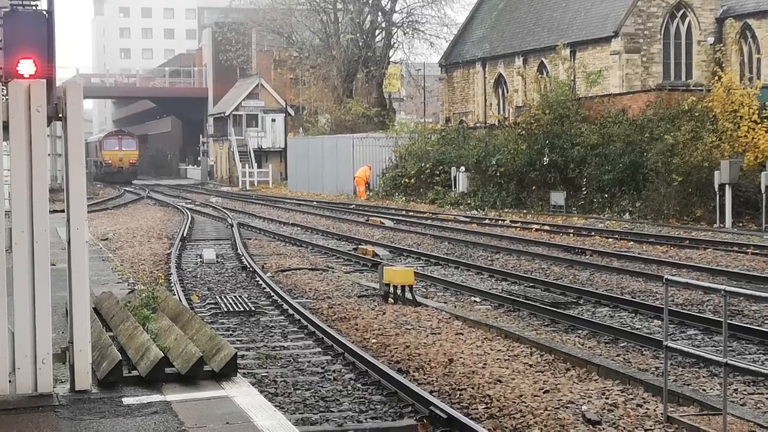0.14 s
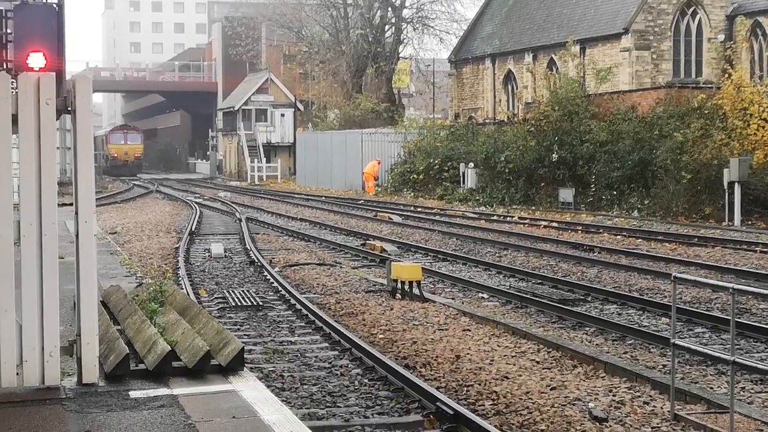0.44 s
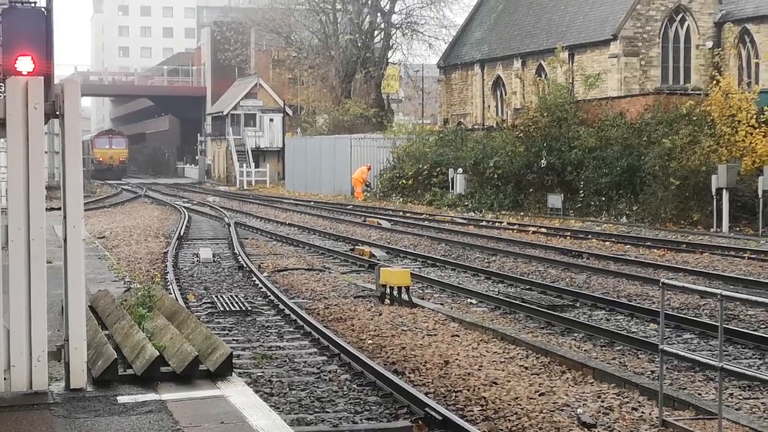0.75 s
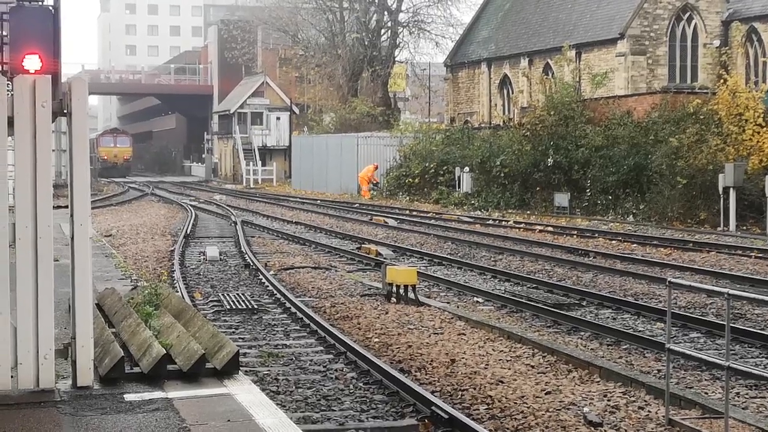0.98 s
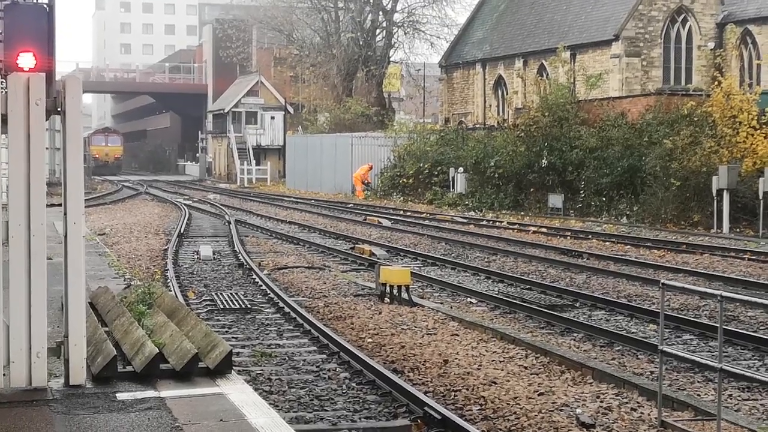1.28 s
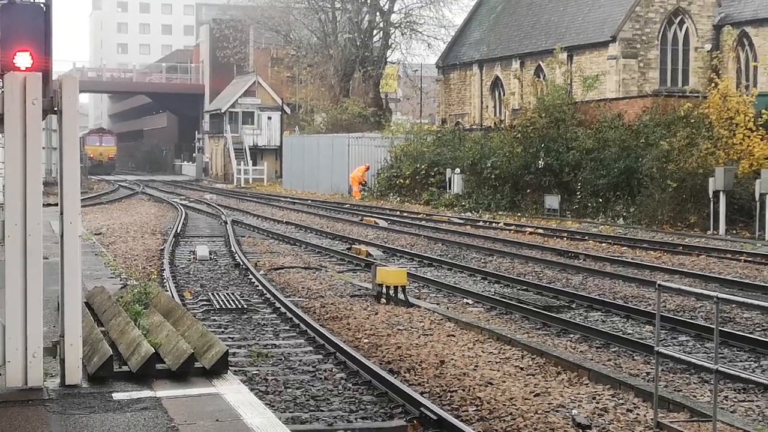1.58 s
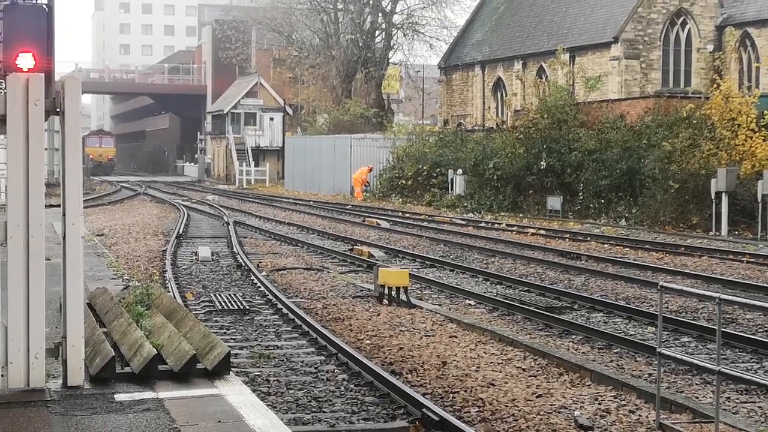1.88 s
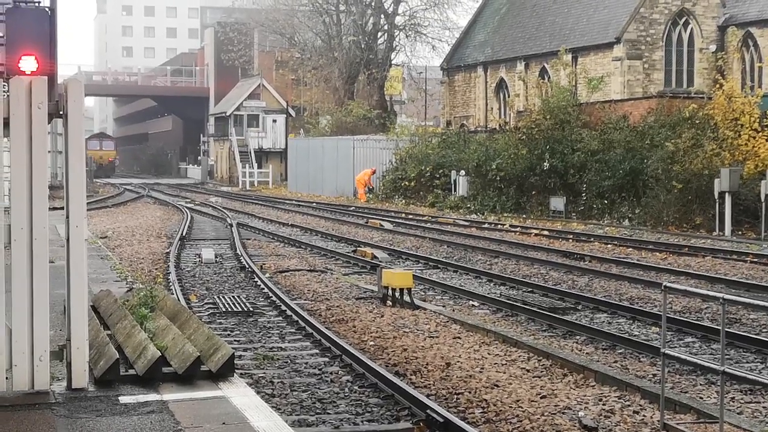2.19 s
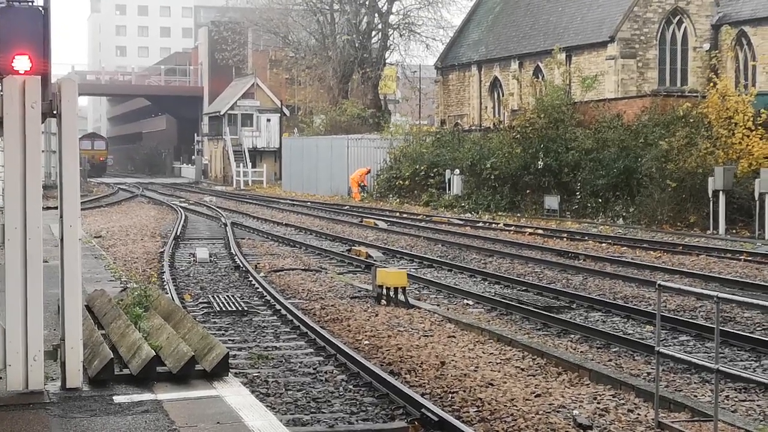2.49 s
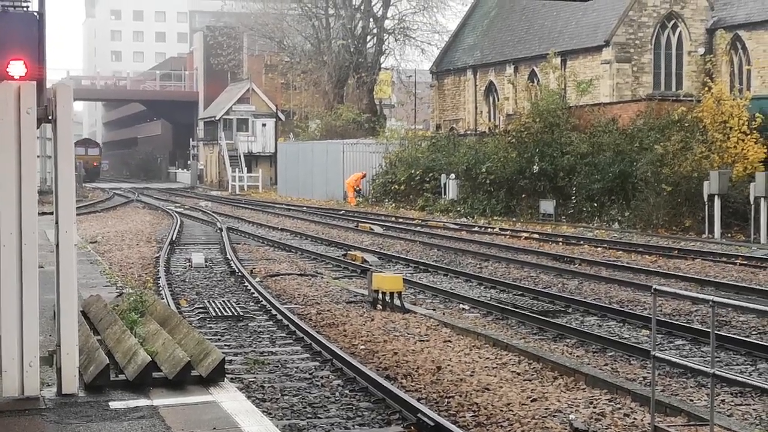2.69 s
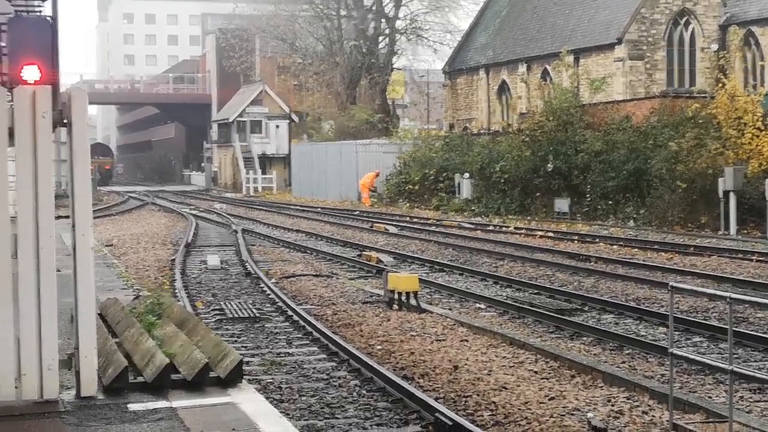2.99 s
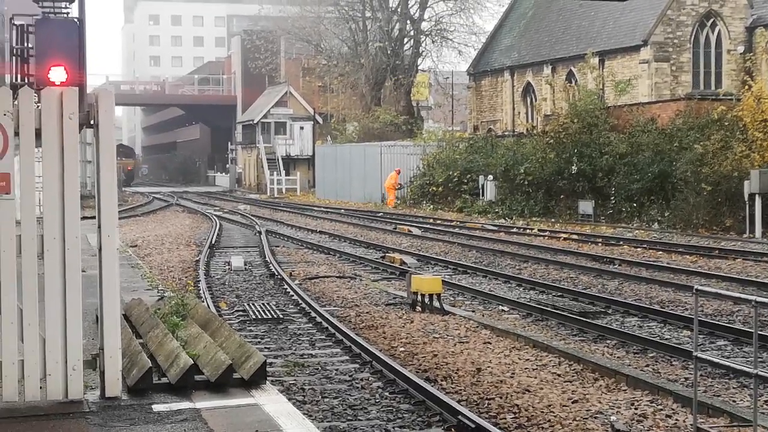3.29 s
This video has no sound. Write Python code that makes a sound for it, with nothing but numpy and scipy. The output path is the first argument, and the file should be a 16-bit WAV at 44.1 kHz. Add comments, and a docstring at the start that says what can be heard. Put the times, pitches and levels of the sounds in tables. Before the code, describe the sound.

Diesel locomotives drone and rumble away from a station platform under a steady, airy hiss.

```python
"""A diesel engine idles close by a station platform while two diesel locomotives draw away.
The idler is a harmonic sum on one unsteady firing rate: a deep throb that rises and falls in level.
The far exhausts drone as wavering sines, throb and chug as short tone bursts, and rumble as shaped noise.
Their machinery is filtered noise: a roar smeared by reflections, narrow resonances, and a hiss
with a faint turbocharger whistle."""
import sys
import numpy as np
from scipy import signal
from scipy.fft import rfft, irfft
from scipy.io import wavfile
from scipy.ndimage import map_coordinates

SR = 44100
rng = np.random.default_rng(int(sys.argv[2]) if len(sys.argv) > 2 else 0)


def store_wav(level_fs):
    """Save 16-bit WAV to argv[1]."""
    pcm = np.round(np.clip(np.atleast_2d(level_fs), -1, 1) * 32767)
    wavfile.write(sys.argv[1], SR, pcm.T.astype(np.int16))


N = 152145

# firing rate of the engine under load: t/s, f/Hz
FIRING = [(0, 169), (.4, 172), (.75, 178), (1.1, 176), (2.0, 175.5), (2.3, 172.5), (2.65, 175),
          (3.45, 176.5)]
# phase lag of the right channel: f/Hz, lag/rad
RIGHT_LAG = [(40, 0), (150, 0.54), (260, 0.084), (700, 0.077), (1500, 0.16), (2400, 1), (3600, 0.77),
             (5200, 0.5), (7700, 0.26), (9500, 0.003)]


def idler():
    """Harmonic synthesis: partials locked to one unsteady firing rate share one wavering level."""
    # partials as multiples of the firing rate
    orders = [2 / 3, 1, 3, 5, 7]
    # their relative levels: level/dB
    order_db = [-11, 0, -26.5, -22, -31]
    # level of the partial at the firing rate: t/s, level/dB
    idle_db = [(0, -28.5), (.12, -36.5), (.2, -28), (.3, -38), (.65, -30), (.95, -32.5), (1.28, -29.5),
               (1.47, -36), (1.78, -28), (1.88, -37.5), (2.02, -32), (2.32, -32.5), (2.44, -31), (2.9, -34),
               (3.05, -31), (3.45, -32)]
    firing_hz = 39.9 * (1 + 0.0041 * walk(4.6))
    waver_db = 0.14 * walk(7)
    strength = undb(curve(idle_db) + waver_db)
    partials = sum(undb(db) * np.sin(turn(order * firing_hz)) for order, db in zip(orders, order_db))
    return strength * np.sqrt(2) * partials


def exhausts():
    """Pulsed gas flow: periodic firing gives tones, single surges give bursts, turbulence gives rumble."""
    # level of the firing tone: t/s, level/dB
    firing_db = [(0, -50.5), (.42, -43), (.72, -52), (1.2, -47), (1.55, -45), (1.75, -49.5), (1.93, -41.5),
                 (2.1, -51), (2.4, -46), (2.85, -41.5), (3.45, -44.5)]
    # soft, sustained boom: t/s, f/Hz, level/dB
    boom = [(0, 69.04, -37), (.75, 71.25, -41), (1.4, 73.1, -42), (2.0, 74.5, -43), (3.0, 74.07, -41.5),
            (3.45, 73.5, -40)]
    # lower tone that briefly joins the drone and sinks: t/s, f/Hz, level/dB
    sag = [(1.951, 167.7, -81), (2.12, 164.1, -40), (2.3, 160.7, -54), (2.5, 158, -51)]
    # deep throbs: t/s, length/s, f/Hz, level/dB
    throbs = [(.035, 0.054, 66, -30), (.175, 0.034, 62.2, -30), (.34, 0.042, 66.24, -29.5),
              (.46, .04, 69.74, -28.5), (.57, 0.034, 68, -30), (.74, 0.043, 66, -28.5),
              (.86, 0.037, 63, -29), (1.11, .06, 62, -33), (1.39, 0.055, 66.7, -32.5),
              (1.55, .04, 66.1, -33), (1.71, .08, 71, -36), (2.0, 0.055, 65.9, -35),
              (2.15, .05, 68.1, -36.5), (2.42, .05, 70.5, -34), (2.91, 0.07, 71.3, -35),
              (3.31, 0.042, 68, -43), (3.44, 0.049, 69.25, -30.5)]
    # higher, hollow chugs: t/s, length/s, f/Hz, level/dB
    chugs = [(.09, 0.023, 248.5, -45), (.21, 0.054, 241, -43.5), (.48, 0.035, 230, -49.5),
             (.84, 0.04, 241, -42), (1.0, 0.063, 256.5, -47), (1.27, 0.042, 247, -47),
             (1.45, .07, 245, -47), (1.61, 0.061, 228, -45), (1.97, 0.043, 228, -51),
             (2.35, 0.024, 238, -43.5), (2.55, 0.046, 258.3, -48.5), (3.25, .04, 246, -49.5)]
    # relative spectrum of the rumble: f/Hz, density level/dB
    rumble_spectrum = [(8, -20), (20, -8.5), (34, -3), (45, 1), (53, 1.5), (64, -1), (77, -3.5), (85, -8),
                       (108, -11.5), (135, -11), (170, -10), (200, -9), (218, -15), (242, -11), (290, -17),
                       (370, -26), (600, -38)]
    # level of the rumble: t/s, level/dB
    rumble_db = [(0, -37.5), (.9, -38.5), (1.6, -37.5), (2.4, -38.5), (2.8, -38.5), (3.45, -38)]

    first = drone(curve(FIRING), curve(firing_db), wander=0.0034, waver_db=1.3)
    second = drone(134.4, -51.5, wander=0.00045, waver_db=3.0)  # the second locomotive: Hz, dB
    tones = first + second
    for tone in (boom, sag):
        tones = tones + drone(curve(tone), curve(tone, axis=2), wander=0.0066, waver_db=2)
    beats = surges(throbs, wander=0.027) + surges(chugs, wander=0.0248)
    rumble = undb(curve(rumble_db)) * outdoors(colour(rumble_spectrum))
    return tones + beats + rumble


def drone(hz, db, wander, waver_db):
    """Frequency and amplitude modulation by slow chance: a sine unsteady in pitch (share) and level (dB)."""
    strength = undb(db + waver_db * walk(15))
    unsteady_hz = hz * (1 + wander * walk(8.3))
    return np.sqrt(2) * strength * np.sin(turn(unsteady_hz))


def surges(table, wander):
    """Tone bursts: each surge of gas is a sine under a rounded envelope, all bent in pitch together."""
    bend = 1 + wander * walk(13.5)
    total = 0
    for when, length, hz, db in table:
        total = total + undb(db) * swell(when, length) * np.sin(turn(hz * bend))
    return np.sqrt(2) * total


def swell(when, length):
    """Gaussian envelope: a rounded rise and fall, `length` s wide at half power."""
    return 2 ** (-2 * ((np.arange(N) / SR - when) / length) ** 2)


def machinery():
    """Amplitude modulation at the firing rate: roar and rush pulse faintly, with resonances among them."""
    # relative spectra of the roar and of the sharper rush above it: f/Hz, density level/dB
    roar_spectrum = [(330, -5), (387, -11), (520, -10), (660, -7), (880, -8), (1080, -5), (1230, -5.5),
                     (1500, -.5), (1740, -2.5), (1950, 0), (2250, -3), (2450, -4)]
    rush_spectrum = [(2500, -1), (2860, -0.5), (3150, -2), (3400, -6), (3700, -7), (4100, -13.5)]
    # their levels: t/s, level/dB
    roar_db = [(0, -42.5), (.6, -43), (.88, -42), (1.02, -42.5), (1.8, -42), (2.45, -42.5), (2.65, -42.5),
               (3.45, -43)]
    rush_db = [(0, -48), (.65, -47), (1.05, -47), (1.2, -45.5), (1.6, -46), (2.05, -44.5), (2.25, -43),
               (2.55, -44), (2.85, -44.5), (3.45, -47)]
    # narrow resonances: f/Hz, width/Hz, level/dB, left minus right/dB
    resonances = [(447, 19, -64.5, 9.5), (1524, 60, -58.5, 2), (1583, 36, -58.5, 5), (1650, 8, -57.5, -9),
                  (1957, 110, -56, -11), (2290, 30, -63, 1), (2524, 16, -57, 2), (2585, 83, -54, 10),
                  (2798, 52, -53.5, 2.5), (3490, 21, -69.5, -18), (3910, 100, -62, 9), (5585, 27, -77, 4)]
    # added gain of the resonances as the engines take the load: t/s, level/dB
    ring_swell_db = [(0, -3.5), (.8, 0), (1.5, 2.8), (2.7, -0.1), (3.45, -0.5)]

    roar = undb(curve(roar_db)) * outdoors(colour(roar_spectrum))
    rush = undb(curve(rush_db)) * outdoors(colour(rush_spectrum))
    pulse = 1 + 0.093 * np.sin(turn(curve(FIRING)))
    flicker = undb(0.3 * walk(3.5))  # spread in dB
    rings = sum(undb(db) * ringing(hz, width, pan_db) for hz, width, db, pan_db in resonances)
    return pulse * flicker * reflected(roar + rush) + undb(curve(ring_swell_db)) * rings


def hiss():
    """Broadband flow noise, with a turbocharger whistle as noise in one narrow resonance."""
    # relative spectrum of the hiss: f/Hz, density level/dB
    hiss_spectrum = [(4000, -1.5), (4260, -1.5), (4540, 0.5), (5850, -1.5), (6200, -3.5), (6600, -4.5),
                     (6800, -2.5), (7000, -5), (7350, -1.5), (7850, -5), (8350, -9.5), (9400, -14),
                     (10300, -26.5), (12000, -29.5), (15200, -36)]
    # levels of the hiss and of the whistle: t/s, level/dB
    hiss_db = [(0, -52), (.4, -51), (.75, -50.5), (1.45, -49.3), (2.0, -48.5), (2.25, -50.5), (2.55, -47.5),
               (2.8, -48.5), (3.15, -50.5), (3.45, -50.5)]
    turbo_db = [(0, -63), (.7, -73), (1.3, -55.5), (2.0, -61), (2.25, -63), (2.6, -66), (3.45, -60)]
    flicker_db = 0.5 * walk(13)
    air = undb(curve(hiss_db) + flicker_db) * reflected(outdoors(colour(hiss_spectrum)))
    whistle = undb(curve(turbo_db)) * ringing(7840, width=120, pan_db=8.5)
    return air + whistle


def ringing(hz, width, pan_db):
    """Resonance driven by noise: a narrow band (Hz) drifts in pitch and wavers in level, later on the right."""
    gain = 1 / (1 + ((bins() - hz) / width * np.sqrt(2)) ** 2)
    drift_hz = hz * 0.003 * walk(1.464)
    # turning the analytic signal shifts its frequency
    shifted = (signal.hilbert(noise(gain)) * np.exp(1j * turn(drift_hz))).real
    left = unit(shifted * undb(2.1 * walk(2.7)))  # level spread in dB
    right = irfft(rfft(left) * np.exp(-1j * across(RIGHT_LAG)), N)
    return pan(pan_db) * np.array([left, right])


def reflected(pair):
    """Comb filtering: late copies interfere with the direct sound, and the comb slides as the trains move."""
    # reflections from the ground and the walls: delay/ms, change of delay/(ms per s), level/dB
    reflections = [(3.303, -0.067, -35.5), (13.454, 0.126, -14), (24.35, -0.153, -16.5)]
    t = np.arange(N) / SR
    out = pair
    for ms, drift, db in reflections:
        delay = (ms + drift * t) / 1000
        place = (t - delay) * SR
        copies = [map_coordinates(channel, [place], mode="mirror") for channel in pair]
        out = out + undb(db) * np.array(copies)
    return out * np.std(pair) / np.std(out)  # the overall level stays


def outdoors(gain):
    """Spatial coherence: noise alike in the bass, loosely related above, a little later on the right."""
    # likeness of the two channels before the lag: f/Hz, correlation
    likeness = [(40, .999), (80, 1), (170, 0.85), (270, 0.89), (420, 0.11), (750, -0.52), (1000, -0.32),
                (1250, 0.32), (1530, 0.44), (1850, 0.3), (2500, 0.12), (3300, 0.58), (4300, -0.18),
                (5100, 0.3), (6000, -0.034), (7800, 0.18), (9000, .4), (12000, 0.2)]
    # balance: f/Hz, left minus right/dB
    tilt = [(200, 0), (400, 0.5), (700, -2.5), (1300, -0.5), (2000, 0.5), (2600, 5), (3200, 2.5), (3900, 1),
            (4500, 3), (5500, 4.5), (6300, 0), (7600, 3.5), (8150, -1), (8900, -2.5), (11000, 0.5)]
    alike = np.clip(across(likeness), -.9, .9995)
    mid, side = rfft(rng.standard_normal((2, N))) * gain
    side = side * np.sqrt((1 - alike) / (1 + alike))  # side-to-mid ratio sets the correlation
    lag = np.exp(-1j * across(RIGHT_LAG))
    spectra = np.array([mid + side, (mid - side) * lag])
    pair = irfft(spectra * pan(across(tilt)), N)
    return pair / np.std(pair.mean(axis=0))


def pan(db):
    """Interaural level difference: left and right gains, half the difference each."""
    return undb(np.array([[1], [-1]]) * db / 2)


def turn(hz):
    """Phase is the integral of frequency, from a random start."""
    return 2 * np.pi * (np.cumsum(hz) / SR + rng.random())


def walk(rate):
    """Low-pass random modulation: slow chance of spread 1, with a Gaussian spectrum `rate` Hz wide."""
    gain = np.exp(-.5 * np.minimum(bins() / rate, 20) ** 2)
    return noise(gain * (np.arange(N // 2 + 1) > 0))  # no constant part


def noise(gain):
    """Spectral shaping: white noise filtered by a gain per bin, scaled to rms 1."""
    return unit(irfft(rfft(rng.standard_normal(N)) * gain, N))


def colour(table):
    """Band limiting: gain for a spectrum table, falling 72 dB per octave more beyond its ends."""
    f = bins()
    edges = np.minimum(f / table[0][0], table[-1][0] / f)
    return undb(across(table)) * np.minimum(1, edges) ** 12


def across(table):
    """Logarithmic frequency scale: a table joined by straight lines over log frequency."""
    rows = np.array(table, float)
    return np.interp(np.log(bins()), np.log(rows[:, 0]), rows[:, 1])


def bins():
    """Discrete spectrum: frequency of each bin in Hz, at least 1."""
    return np.maximum(np.arange(N // 2 + 1) * SR / N, 1)


def curve(table, axis=1):
    """Linear interpolation: one column of a table joined by straight lines in time."""
    rows = np.array(table, float)
    return np.interp(np.arange(N) / SR, rows[:, 0], rows[:, axis])


def unit(x):
    """Power normalisation: scale to rms 1."""
    return x / np.sqrt(np.mean(x ** 2))


def undb(db):
    """Level to amplitude: 20 dB is a factor of ten."""
    return 10 ** (np.asarray(db) / 20)


def scene():
    """Superposition: the near idler and the departing locomotives add."""
    return idler() + exhausts() + machinery() + hiss()


def record(dry):
    """Low-pass filtering: a steep elliptic filter cuts the top above 15.2 kHz."""
    return signal.sosfilt(signal.ellip(8, .2, 70, 15200, fs=SR, output="sos"), dry)


dry = scene()
out = record(dry)
store_wav(out)
```